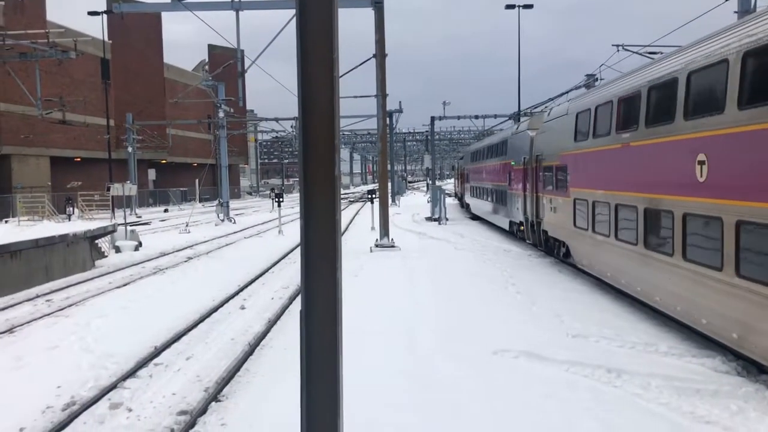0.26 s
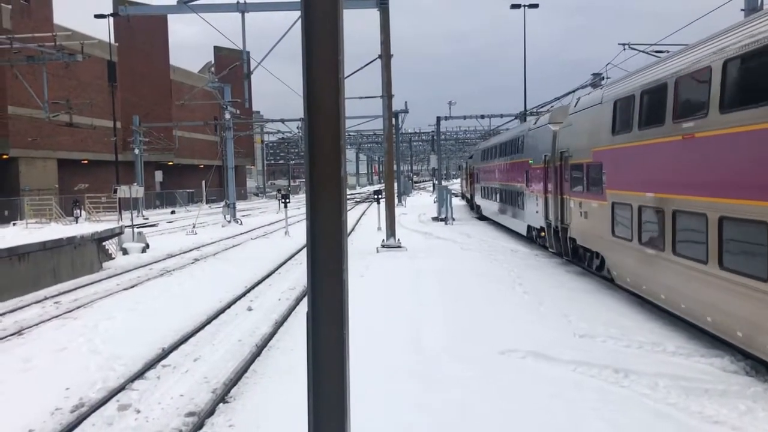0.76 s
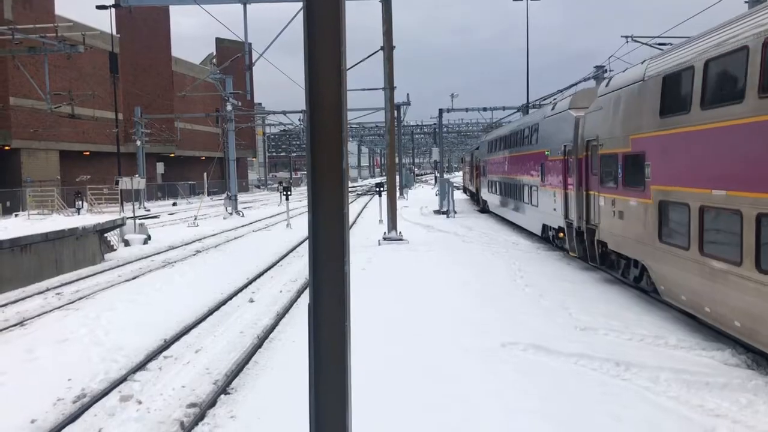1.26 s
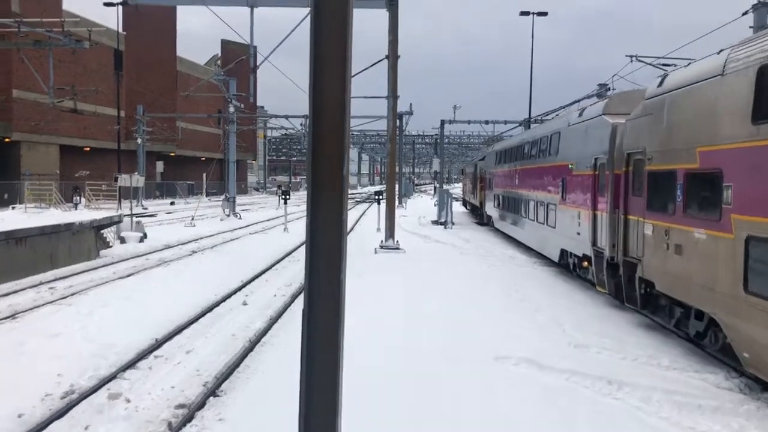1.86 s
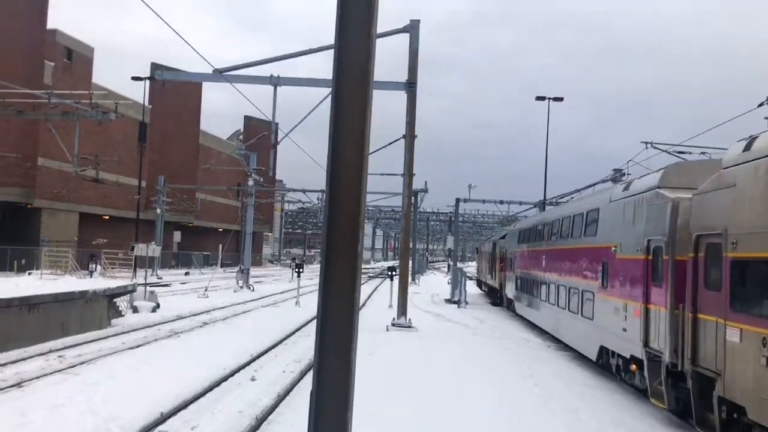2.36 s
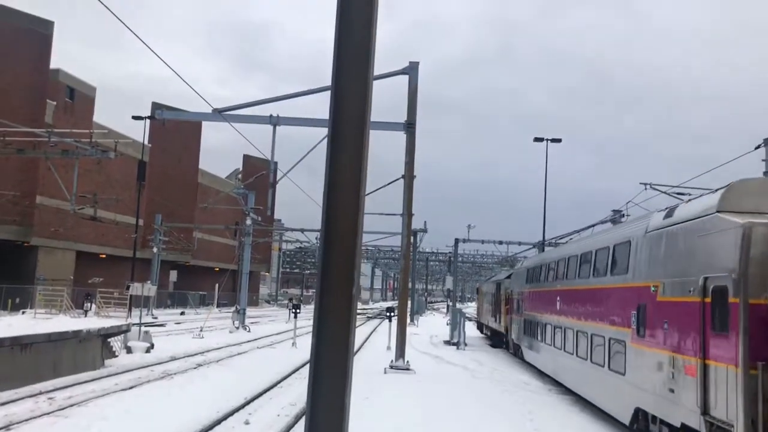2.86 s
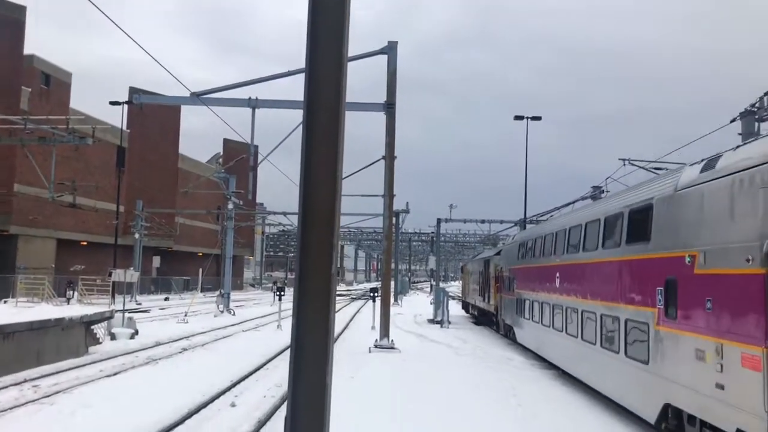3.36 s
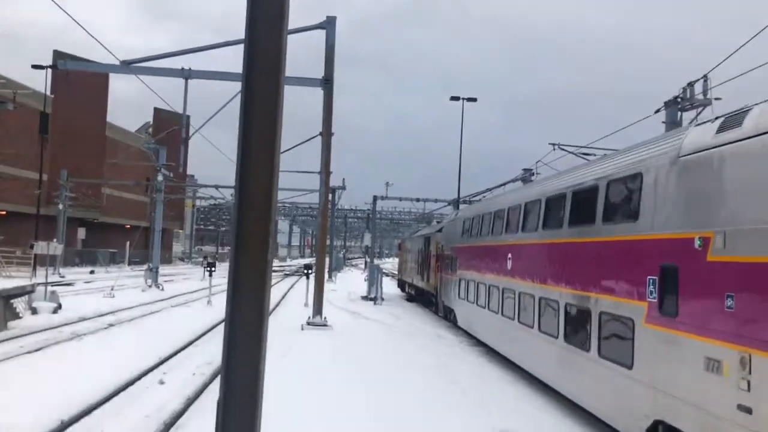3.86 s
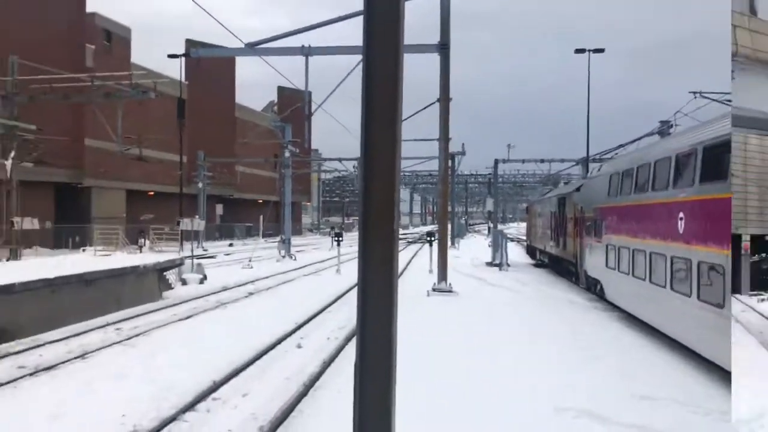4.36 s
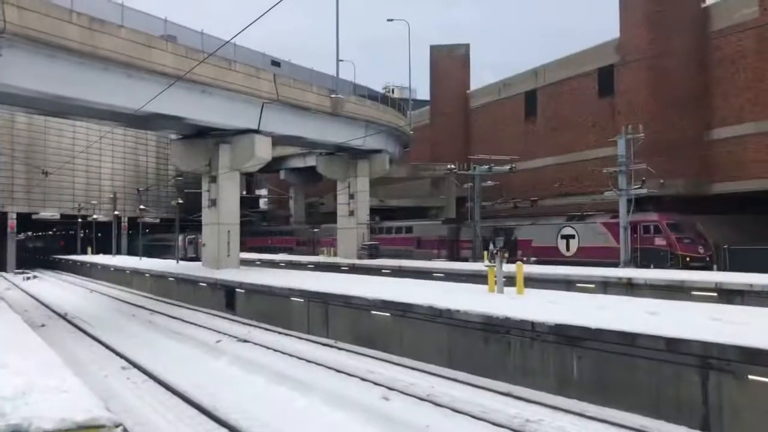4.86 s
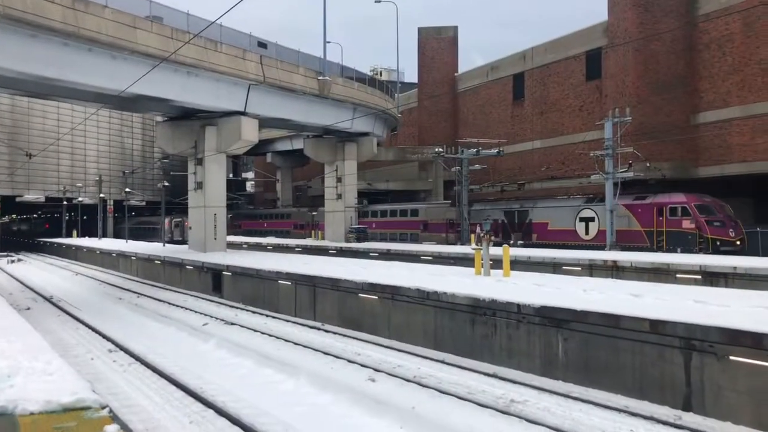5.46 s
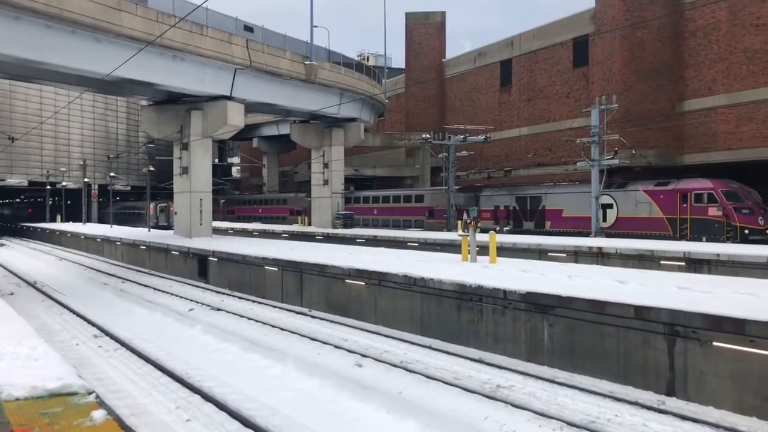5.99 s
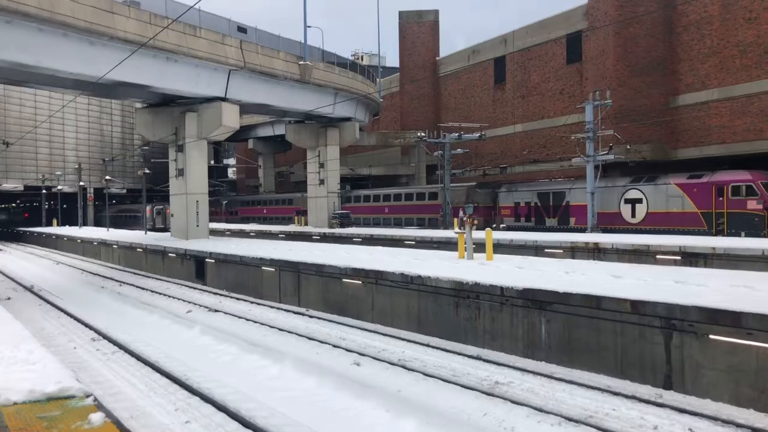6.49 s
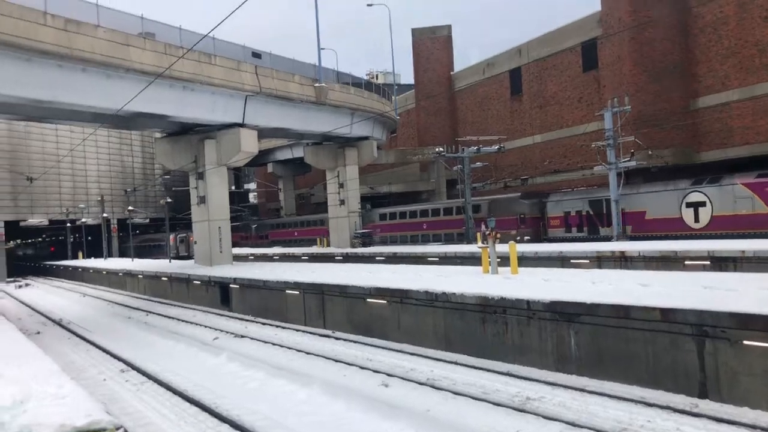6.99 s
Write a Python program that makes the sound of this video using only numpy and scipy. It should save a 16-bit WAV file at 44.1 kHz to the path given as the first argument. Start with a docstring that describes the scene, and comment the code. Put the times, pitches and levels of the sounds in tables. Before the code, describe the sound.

A passenger train rolls slowly past with singing, chirping wheels and joint knocks, then a louder diesel locomotive throbs and vents a sharp air blast.

```python
"""A rail yard. A diesel passenger train rolls slowly by on a curve: its flanges sing, wheels chirp and knock over joints.
It fades into a second spot, where another locomotive throbs loudly, vents a blast of air and gives a short squeal.
Engines are stacked sines locked to a crankshaft, rolling and air are coloured noise, and steel is gliding tones
and noise-driven resonances. Thin whines of steady pitch hang over both spots; walls answer the wheels and the air."""
import sys
import numpy as np
from scipy import signal
from scipy.fft import rfft, irfft, next_fast_len
from scipy.io import wavfile
from scipy.ndimage import map_coordinates

SR = 44100
rng = np.random.default_rng(int(sys.argv[2]) if len(sys.argv) > 2 else 0)


def int16_out(signal):
    """Quantize to a 16-bit WAV file."""
    q = np.round(np.clip(np.atleast_2d(signal).T, -1, 1) * 32767)
    wavfile.write(sys.argv[1], SR, q.astype(np.int16))


N = 318843
TIME = np.arange(N) / SR
TOP_HZ = 15720  # band limit of the mix

# Tables. A colour is the relative spectrum of a noise layer: hz, level_db.
# Level curves are starting points: the layers add their own trims and flutter.

# Passing diesel, crankshaft speed: time_s, turns_per_s
PASSING_SPEED = [(0, 5.74), (.6, 5.97), (1.5, 5.65), (2.5, 5.94), (3.5, 6.06), (4.2, 5.86), (4.8, 6.8)]
# Passing diesel, loudness: time_s, firing_note_db, upper_exhaust_db
PASSING_LEVEL = [(0, -35, -36), (.35, -28.5, -31), (.9, -28.5, -34.5), (1.35, -31, -28.5),
                 (1.65, -22.5, -34.5), (2.1, -26, -37.5), (2.7, -31.5, -34.5), (3.05, -27, -27.5),
                 (3.55, -28, -25), (4, -25, -25), (4.4, -26, -31)]
# Exhaust orders around the firing note: crankshaft_multiple, level_db
PASSING_LOW = [(8, -45), (10, -35), (11, -40.5), (13, -36)]
# Upper exhaust orders: crankshaft_multiple, level_db (against the upper exhaust curve)
PASSING_HIGH = [(15, -10), (16, -1), (20, -4.5), (24, -19)]
# Rolling train, loudness: time_s, rumble_db, roar_db, hiss_db
ROLLING = [(0, -42, -42.5, -51.5), (.6, -40.5, -43.5, -53.5), (1.2, -38, -42.5, -51),
           (1.8, -41, -42.5, -54.5), (2.4, -40.5, -42.5, -52), (3, -40, -41.5, -52),
           (3.5, -36, -41.5, -48.5), (4, -37, -40.5, -51), (4.4, -36.5, -41.5, -50)]
# Colours of the rolling layers: hz, level_db
RUMBLE = [(76, -29), (130, -4), (156, -14.5), (221, -7.5), (249, -12), (500, -20.5), (650, -53),
          (1100, -120)]
ROAR = [(180, -17.5), (300, -3), (402, -9.5), (472, -3), (573, -3), (1320, -9.5), (1520, -11), (2500, -20),
        (3250, -34), (5500, -120)]
HISS = [(1500, -3), (2300, -0.5), (3500, -0.5), (4700, -2.5), (7000, -10.5), (9500, -14.5), (12000, -20),
        (15500, -35)]
GROUND = [(15, -17), (28, 6), (38, -11), (50, 18), (75, 17), (110, 3), (140, 0), (220, -38.5)]
# Soft high hiss, loudness: time_s, level_db
SPRAY = [(0, -85), (3.27, -78), (3.33, -46), (3.7, -46), (3.95, -55), (4.3, -58), (4.6, -51)]
# Colour of that hiss: hz, level_db
SPRAY_COLOUR = [(3000, -20), (6000, 1), (9000, 4), (15000, -10)]
# Whines of the passing train: pitch_hz, width_hz, level_db
PASSING_WHINE = [(1538, 57, -49), (1736, 47, -48.5), (2834, 125, -52.5), (4120, 25, -64.5)]

# Flange rubbing on the rail, loudness between bites: time_s, level_db
FLANGE = [(0, -38.5), (.35, -44.5), (.9, -42), (1.9, -44.5), (2.6, -38.5), (3.35, -40.5), (3.6, -58),
          (4.05, -57), (4.4, -48.5)]
# The flange bites harder, louder and harsher, at another pitch: start_s, length_s, force (0-1), held_pitch_hz
BITES = [(0, .17, 0.54, 5950), (.385, .05, .9, 5400), (0.439, 0.169, 0.63, 5350), (0.983, .14, 0.5, 5650),
         (1.523, .24, .9, 5624), (2.027, .26, .85, 5560), (2.35, .08, 0.6, 5380), (2.491, .26, 0.4, 5560),
         (2.768, .05, 0.6, 5200), (2.847, .12, 0.85, 5500), (3.03, .07, 0.4, 5520), (3.12, .22, 0.9, 5450),
         (4.21, .08, .8, 5650)]
FREE_HZ, BITE_GLIDE_S = 5910, .035  # pitch between bites; time constant of the slide into one
BITE_ATTACK_S, BITE_RELEASE_S = .025, .035
# gain at full force; the octave between bites against the flange, and its gain at full force
BITE_DB, OCTAVE_DB, OCTAVE_BITE_DB = 6.5, -18.5, 16
# Wheels on rail joints: start_s, thud_db, clank_db
JOINTS = [(.045, -32, -36), (0.393, -22.5, -55), (.6, -24.5, -50), (.95, -30, -55), (1.112, -39, -30),
          (1.67, -32, -63), (1.965, -37, -44), (2.22, -26.5, -57), (2.99, -28, -51), (3.19, -26, -38),
          (3.5, -24, -55), (3.69, -22, -34), (4.066, -27, -28.5)]
# Colours of the two halves of a joint knock: hz, level_db
THUD = [(60, -19), (130, 2.5), (200, -1.5), (350, -13.5), (800, -24), (2000, -53)]
CLANK = [(300, -18), (900, 13), (1600, 5), (2300, 5), (3200, -3), (4500, 1), (9000, -10), (15000, -32)]
# Short wheel squeals: start_s, length_s, start_hz, settled_hz, level_db, octave_db (against level), scatter (share)
CHIRPS = [(0.103, 0.2, 7900, 7440, -39.5, -35, 0.005), (0.606, 0.044, 5100, 4530, -37.5, -4, 0.015),
          (0.757, 0.22, 6800, 6400, -48, -27, .018), (1.005, 0.11, 4800, 4570, -36, -6, 0.0083),
          (1.401, 0.063, 5000, 4590, -39.5, -1.5, 0.0072), (1.482, 0.05, 5200, 4620, -38.5, -6, 0.0098),
          (2.233, 0.046, 5300, 4820, -39.5, -9.5, 0.044), (2.77, .05, 5430, 5120, -41, -14, 0.0303),
          (3.253, 0.11, 2720, 2690, -43.5, -24, .013), (3.385, 0.119, 2740, 2626, -41.5, -24, 0.0148),
          (3.535, 0.088, 2720, 2665, -42.5, -24, .013), (3.314, 0.04, 5230, 4600, -41, -7.5, 0.032),
          (3.766, 0.079, 5380, 5170, -42.5, -10, .01)]
# Catches of a higher wheel mode: start_s, length_s, middle_pitch_hz, level_db
HIGH_MODE = [(.11, 0.2, 7630, -42), (.43, .05, 8250, -52), (.94, .06, 8250, -50), (1.277, .19, 7640, -51),
             (1.49, .04, 8250, -49), (1.771, 0.24, 8050, -46), (2.27, .05, 7970, -53),
             (2.481, .27, 8060, -47), (2.99, 0.048, 8400, -51), (3.05, 0.034, 7900, -48),
             (3.1, .04, 8170, -45), (3.383, 0.086, 8180, -42.5), (3.5, 0.15, 7800, -47.5),
             (3.73, 0.042, 8200, -51), (4.01, .16, 8000, -51)]
CATCH_ATTACK_S, CATCH_RELEASE_S, CATCH_SAG_HZ_PER_S = 0.0084, 0.06, 940
# Reverberation of the yard: hz, t60_s
YARD = [(200, .68), (3000, .7), (7000, 0.67), (15000, 0.21)]

# Throbbing diesel, crankshaft speed: time_s, turns_per_s
THROB_SPEED = [(4.2, 4.7), (4.65, 4.97), (5.25, 4.88), (5.6, 4.83), (6.3, 4.795), (7.2, 4.74)]
# Throbbing diesel, loudness: time_s, level_db
THROB_LEVEL = [(4.1, -23), (4.35, -21), (4.55, -14.5), (4.75, -11.5), (5.3, -9.5), (5.8, -12), (6.2, -8.5),
               (6.7, -12), (7.2, -9)]
# Balance of its exhaust orders: crankshaft_multiple, relative_db
THROB_ORDERS = [(6, -22), (11, -23), (12, 2), (13, -7), (14, -10), (15, 1), (16, -17), (17, -18), (18, -16),
                (19, -15), (26, -18.5), (28, -19), (31, -25.5), (34, -22.5), (36, -23), (44, -30.5),
                (46, -24), (48, -25), (57, -25.5)]
# Engine bay and fans, loudness: time_s, body_db, rush_db
BAY = [(4.3, -43, -46), (4.5, -26.5, -34), (4.72, -25.5, -26.5), (4.95, -29.5, -29.5), (5.3, -28, -30.5),
       (5.62, -24, -30), (6, -28.5, -29.5), (6.4, -29, -30), (7.23, -31, -30)]
# Fan air, loudness: time_s, level_db
BAY_AIR = [(4.2, -57), (4.5, -39.5), (4.8, -33), (5.3, -31), (5.8, -33.5), (6.5, -35.5), (7.2, -35.5)]
# Hollow resonance of the bay, loudness: time_s, level_db
BAY_BOOM = [(4.3, -50), (4.7, -35), (5.4, -33), (5.62, -24.5), (6.05, -27.5), (6.25, -34), (7.2, -34.5)]
# Colours of the bay layers: hz, level_db
BAY_BODY = [(15, -14), (28, -6), (38, -24), (60, -9), (100, 7), (150, 1.5), (230, 1), (320, -3), (470, -11),
            (900, -42)]
BAY_RUSH = [(190, -33), (330, -7), (443, 0), (568, -3), (1320, -11.5), (1630, -13), (1730, -13),
            (2000, -19.5), (2600, -22), (4400, -120)]
BAY_FIZZ = [(1120, -44), (1900, -5), (2390, -6), (2750, -1), (3390, -4.5), (4950, -4), (5650, -8.5),
            (8240, -8), (10900, -10), (12700, -15), (15500, -16)]
# Whines of the bay: pitch_hz, width_hz, level_db (against the fan air)
BAY_WHINE = [(1527, 67, -14), (2028, 43, -17.5), (2650, 14, -16), (2780, 90, -16), (4890, 300, -15.5)]
# The bay's whistle swells and ebbs evenly around this level
WHISTLE_DB, WHISTLE_SWING_DB, WHISTLE_PEAK_S, WHISTLE_PERIOD_S = -42, 6, 4.677, 0.669

# Puffs of the air valve: start_s, attack_s, hold_s, fall_db_per_s, level_db, whistle_hz, glide_hz_per_s
VALVE = [(4.904, 0.0074, 0.18, 170, -19.5, 4370, -4000), (5.18, .07, 0.068, 88, -28.5, 4850, 300)]
WHISTLE_BUILD_S = 0.069  # the valve's whistle takes a moment to speak
# Colour of the air jet: hz, level_db
JET = [(1650, -33), (2800, -10), (3370, -4), (3700, -3), (5230, -2), (6210, 3), (6910, -1), (8270, 0.5),
       (14000, -2.5), (15500, -5)]
# Colour of the clunk in the rigging: hz, level_db
KNOCK = [(200, -33.5), (500, 5.5), (950, 4), (1400, -9), (3000, -42)]
# Squeal after the blast
BRAKE_S, BRAKE_LENGTH_S, BRAKE_ATTACK_S, BRAKE_RELEASE_S = 5.166, 0.064, 0.011, 0.0079
BRAKE_HZ, BRAKE_RISE_HZ, BRAKE_GLIDE_S = 2870, 159, .035
BRAKE_DB, BRAKE_SWELL_DB_PER_S = -27, 84


def amp(db):
    """Decibels to gain."""
    return 10 ** (np.asarray(db) / 20)


def unit(x):
    """Scaled to rms 1."""
    return x / np.sqrt(np.mean(x ** 2) + 1e-20)


def along(points, hz):
    """Values between (Hz, value) points, read on a log frequency axis."""
    f, v = np.transpose(points)
    return np.interp(np.log(hz + 1), np.log(f + 1), v)


def curves(rows):
    """One value per sample for each column after the time."""
    s, *cols = np.transpose(rows)
    return [np.interp(TIME, s, c) for c in cols]


def wobble(rate):
    """A smooth random curve with rate knots a second."""
    knots = rng.standard_normal(int(N * rate / SR) + 4)
    return map_coordinates(knots, [TIME * rate])


def held(s, length, attack_s, release_s):
    """An envelope that rises at s, holds for the length and lets go."""
    t = TIME - s
    return np.clip(t / attack_s, 0, 1) * np.clip(1 - (t - length) / release_s, 0, 1)


def filtered(x, response):
    """x shaped by a gain that depends on frequency."""
    m = next_fast_len(N + SR // 2)
    return irfft(rfft(x, m) * response(np.fft.rfftfreq(m, 1 / SR)), m)[:N]


def rush(colour):
    """Coloured noise of rms 1."""
    return unit(filtered(rng.standard_normal(N), lambda hz: amp(along(colour, hz))))


def angle(hz):
    """Running phase of a changing frequency."""
    return 2 * np.pi * np.cumsum(hz) / SR


def tone(phase):
    """A sine of rms 1 that starts anywhere in its cycle."""
    return np.sqrt(2) * np.sin(phase + rng.uniform(0, 2 * np.pi))


def rubbed(hz, width_hz):
    """A resonance driven by noise: a fuzzy line of rms 1 that can glide."""
    # slow noise on both quadratures of a carrier spreads the line around its pitch
    drive = [filtered(rng.standard_normal(N), lambda f: 1 / (1 + (f / width_hz) ** 2)) for _ in range(2)]
    phase = angle(hz + np.zeros(N))
    return unit(drive[0] * np.cos(phase) + drive[1] * np.sin(phase))


def exhaust(crank, orders, unsteady_db):
    """Unequal cylinders sound at multiples of the crankshaft's turn, each wavering in level."""
    return sum(amp(db + unsteady_db * wobble(5)) * tone(order * crank) for order, db in orders)


def passing_diesel():
    """A twelve-cylinder engine: a firing note at twelve times the crankshaft's turn, with orders around it."""
    crank = angle(curves(PASSING_SPEED)[0] * (1 + 0.0035 * wobble(5.78)))
    firing_db, upper_db = curves(PASSING_LEVEL)
    firing = tone(12 * crank)
    low = exhaust(crank, PASSING_LOW, unsteady_db=1.5)
    high = exhaust(crank, PASSING_HIGH, unsteady_db=2.5)
    return amp(firing_db - 0.5) * firing + low + amp(upper_db - 2.5) * high


def rolling():
    """Wheels on rough rail shake the ground and the car bodies as bands of noise; fans whine."""
    rumble_db, roar_db, hiss_db = curves(ROLLING)
    rumble = amp(rumble_db + 4.0 + 1.43 * wobble(18)) * rush(RUMBLE)
    ground = amp(-33.0) * rush(GROUND)
    roar = amp(roar_db + 6.43 + 0.62 * wobble(21.98)) * rush(ROAR)
    hiss = amp(hiss_db + 7 + 1.4 * wobble(29.36)) * rush(HISS)
    spray = amp(curves(SPRAY)[0]) * rush(SPRAY_COLOUR)
    whine = sum(amp(db + 2.2 * wobble(3.83)) * rubbed(hz, width / 2) for hz, width, db in PASSING_WHINE)
    return rumble + ground + roar + hiss + spray + whine


def flange_contact():
    """Level, level of the octave and pitch of the flange as it bites and eases."""
    force, hz = np.zeros(N), np.full(N, float(FREE_HZ))
    for s, length, strength, held_hz in BITES:
        bite = held(s, length, BITE_ATTACK_S, BITE_RELEASE_S)
        force = np.maximum(force, strength * bite)
        slide = 1 - np.exp(-np.maximum(TIME - s, 0) / BITE_GLIDE_S)
        hz += (held_hz - FREE_HZ) * bite * slide
    db, = curves(FLANGE)
    return db + BITE_DB * force, db + OCTAVE_DB + OCTAVE_BITE_DB * force, hz


def flanges():
    """Flanges stick and slip on the curve: two sliding, skittering strands play around a fixed wheel mode."""
    db, octave_db, pitch = flange_contact()
    hz = pitch * (1 + .009 * wobble(22) + .009 * wobble(55))
    phase = angle(hz * (1 + .008 * wobble(650)))  # fast skitter roughens the tone
    scrape = .32 * rubbed(5900, width_hz=320)
    partner = .4 * rubbed(hz + 170 * wobble(12), width_hz=110)
    sing = .68 * tone(phase) + partner + scrape
    wheel = amp(-6 + 3.0 * wobble(10)) * rubbed(5590, width_hz=46)
    octave = amp(-7.5) * tone(2 * phase)
    octave += amp(-6) * rubbed(2 * hz, width_hz=470)
    octave += amp(-7.5) * rubbed(11160, width_hz=90)
    grip = amp(3 * wobble(45) - 1.2)
    return grip * (amp(db) * (sing + wheel) + amp(octave_db) * octave)


def joints():
    """Each wheel drops over a joint with a thud and a rattle of running gear."""
    thuds, clanks = np.zeros(N), np.zeros(N)
    for s, thud_db, clank_db in JOINTS:
        t = np.maximum(TIME - s, 0)
        rise = 1 - np.exp(-t / 0.0016)
        thuds += rise * amp(thud_db - 60 * t / 0.25)  # falls 60 dB in 0.25 s
        clanks += rise * amp(clank_db - 60 * t / 0.22)
    rattle = amp(2 * wobble(150))
    steel = rush(CLANK) + amp(-10.5) * rubbed(2550, width_hz=53) + amp(-7.5) * rubbed(3250, width_hz=220)
    return thuds * rush(THUD) + clanks * rattle * steel


def chirps():
    """A wheel locks onto one mode: the pitch drops into place, cleanly or in a rough yelp."""
    out = np.zeros(N)
    for s, length, start_hz, hz, db, octave_db, scatter in CHIRPS:
        t = np.maximum(TIME - s, 0)
        skitter = 1 + scatter * wobble(600)
        drop = (start_hz - hz) * np.exp(-t / 0.0106)
        phase = angle((hz + drop) * skitter)
        gate = np.clip(t / 0.0037, 0, 1) * np.clip((length - t) / .008, 0, 1)
        third = (3 * hz < TOP_HZ) * tone(3 * phase)  # left out above the band limit
        voice = tone(phase) + amp(octave_db) * tone(2 * phase) + amp(octave_db - 12) * third
        out += amp(db) * gate * voice
    flutter = amp(3 * wobble(80) - 1)
    return flutter * out


def high_mode():
    """A higher wheel mode catches in fits and starts, sagging in pitch each time."""
    level, hz = np.zeros(N), np.zeros(N)
    for s, length, middle_hz, db in HIGH_MODE:
        level += amp(db) * held(s, length, CATCH_ATTACK_S, CATCH_RELEASE_S)
        sagging_hz = middle_hz - CATCH_SAG_HZ_PER_S * (TIME - s - length / 2)
        hz = np.where(TIME >= s, sagging_hz, hz)
    phase = angle(hz * (1 + .011 * wobble(70) + .016 * wobble(800)))
    grip = amp(3 * wobble(40) - 4.5)
    fuzz = .45 * rubbed(hz, width_hz=210)
    return level * grip * (tone(phase) + fuzz)


def yard(x):
    """The diffuse answer of walls and car sides: a noise tail whose treble dies sooner."""
    hz, t, z = signal.stft(rng.standard_normal(SR), SR, nperseg=256)
    decay = amp(-60 * t / along(YARD, hz)[:, None])
    tail = signal.istft(z * decay, SR, nperseg=256)[1]
    return signal.fftconvolve(x, tail / np.linalg.norm(tail))[:N]


def engine_bay(crank):
    """The bay roars in time with the firing, its air fizzes and whines, and a hollow resonance booms."""
    body_db, rush_db = curves(BAY)
    puffs = 1 + 0.13 * np.sin(12 * crank)
    body = amp(body_db + 1.5 + 1.4 * wobble(16)) * rush(BAY_BODY)
    roar = amp(rush_db + 1.88 + 0.54 * wobble(20)) * rush(BAY_RUSH)
    whine = sum(amp(db + 3.6 * wobble(4)) * rubbed(hz, width / 2) for hz, width, db in BAY_WHINE)
    air = amp(curves(BAY_AIR)[0]) * (rush(BAY_FIZZ) + whine)
    swell = np.cos(2 * np.pi * (TIME - WHISTLE_PEAK_S) / WHISTLE_PERIOD_S)
    whistle = amp(WHISTLE_DB + WHISTLE_SWING_DB * swell) * rubbed(1742, width_hz=17.6)
    boom = amp(curves(BAY_BOOM)[0]) * rubbed(224, width_hz=16.0)
    return puffs * (body + roar) + boom + air + whistle


def throbbing_diesel():
    """Strong neighbouring exhaust orders beat into a throb over the engine bay."""
    crank = angle(curves(THROB_SPEED)[0] * (1 + 0.0021 * wobble(9)))
    arrival = np.clip((TIME - 4.1) / 0.37, 0, 1)
    throb = amp(curves(THROB_LEVEL)[0] + 0.97) * unit(exhaust(crank, THROB_ORDERS, unsteady_db=1.0))
    return arrival * (throb + engine_bay(crank))


def valve():
    """Each puff of air opens, holds and dies away, with a faint gliding whistle."""
    out = np.zeros(N)
    for s, attack_s, hold_s, fall_db_per_s, db, whistle_hz, glide in VALVE:
        t = np.maximum(TIME - s, 0)
        fall_db = fall_db_per_s * np.maximum(t - hold_s, 0)
        flow = np.minimum(t / attack_s, 1) * amp(db - fall_db + 1.6 * wobble(70))
        build = np.minimum(t / WHISTLE_BUILD_S, 1)
        gliding = amp(-9.0) * build * rubbed(whistle_hz + glide * t, width_hz=340)
        steady = amp(-12.5) * rubbed(8450, width_hz=180)
        out += flow * (rush(JET) + gliding + steady)
    return out


def air_brake():
    """A valve spits air, the rigging groans and clunks, and the last air leaves softly."""
    groan = amp(-23.5) * np.exp(-((TIME - 4.97) / 0.021) ** 2) * rubbed(491.5, width_hz=36)
    clunk = amp(-19.0) * np.exp(-((TIME - 5.08) / 0.021) ** 2) * rush(KNOCK)
    sigh = amp(-29) * np.exp(-((TIME - 5.28) / 0.21) ** 2) * rubbed(5400, width_hz=1200)
    return valve() + sigh + groan + clunk


def brake_squeal():
    """A brake shoe sings briefly, swelling and rising in pitch."""
    t = np.clip(TIME - BRAKE_S, 0, BRAKE_LENGTH_S)
    pitch = BRAKE_HZ + BRAKE_RISE_HZ * (1 - np.exp(-t / BRAKE_GLIDE_S))
    phase = angle(pitch * (1 + .007 * wobble(400)))
    octave = amp(-1) * tone(2 * phase) + amp(-7) * rubbed(2 * pitch, width_hz=200)
    voice = tone(phase) + octave + amp(-19) * tone(3 * phase)
    envelope = held(BRAKE_S, BRAKE_LENGTH_S, BRAKE_ATTACK_S, BRAKE_RELEASE_S)
    return amp(BRAKE_DB + BRAKE_SWELL_DB_PER_S * t) * envelope * voice


def scene():
    """The passing train fades out as the second locomotive comes in."""
    wheels = flanges() + high_mode() + chirps()
    passing = passing_diesel() + rolling() + joints() + wheels + amp(-10) * yard(wheels)
    fade = np.clip((4.8 - TIME) / 0.27, 0, 1)
    air = air_brake() + brake_squeal()
    echo = amp(-10) * yard(air)
    return (fade * passing + throbbing_diesel() + air + echo)[None]


def record(dry):
    """Peaks are rounded off softly, and nothing is kept above the band limit."""
    rounded = dry[0] / (1 + np.abs(dry[0] / .98) ** 10) ** (1 / 10)
    return filtered(rounded, lambda hz: hz < TOP_HZ)[None]


dry = scene()
out = record(dry)
int16_out(out)
```